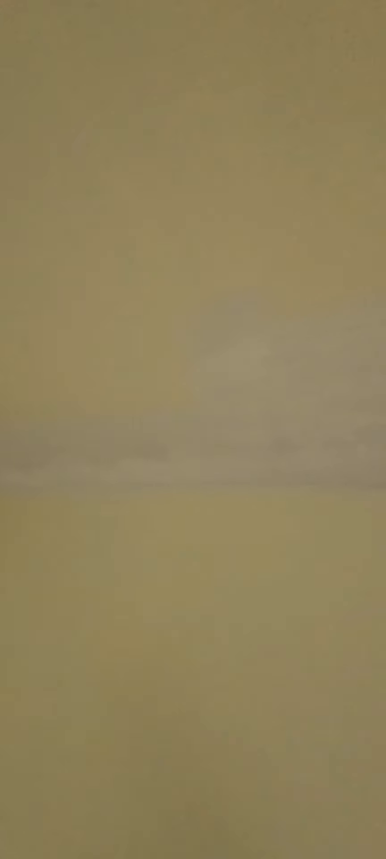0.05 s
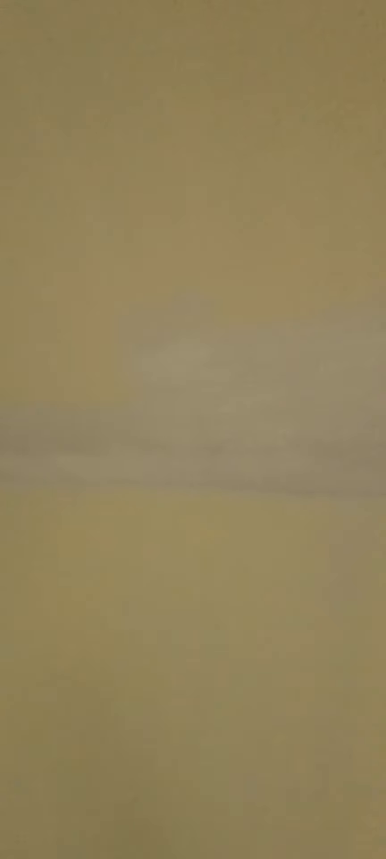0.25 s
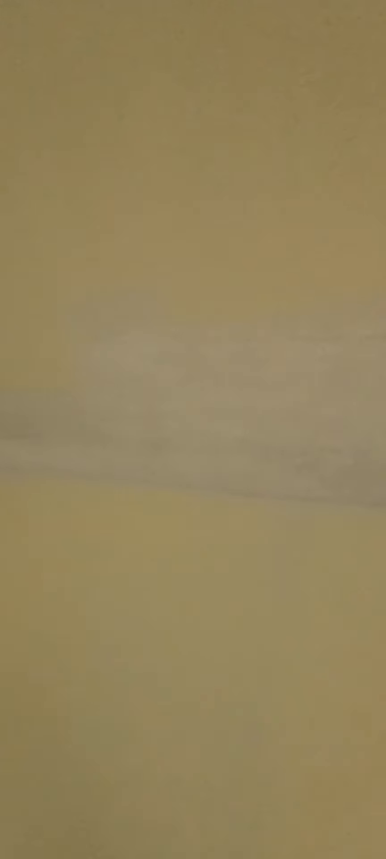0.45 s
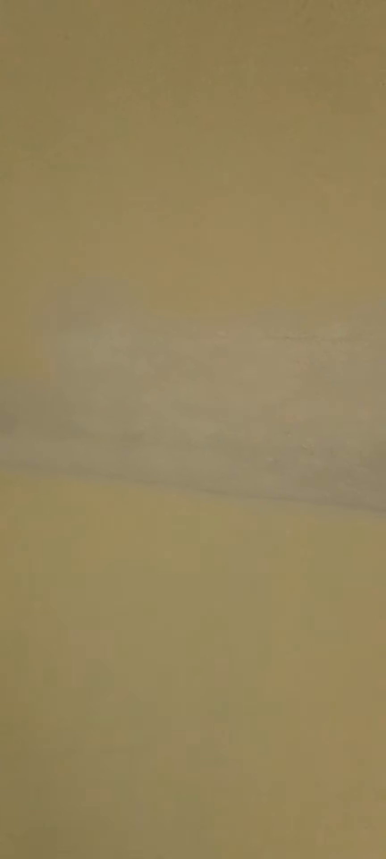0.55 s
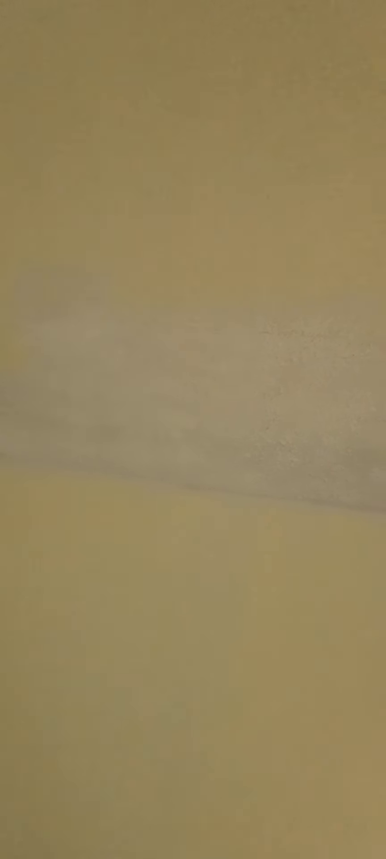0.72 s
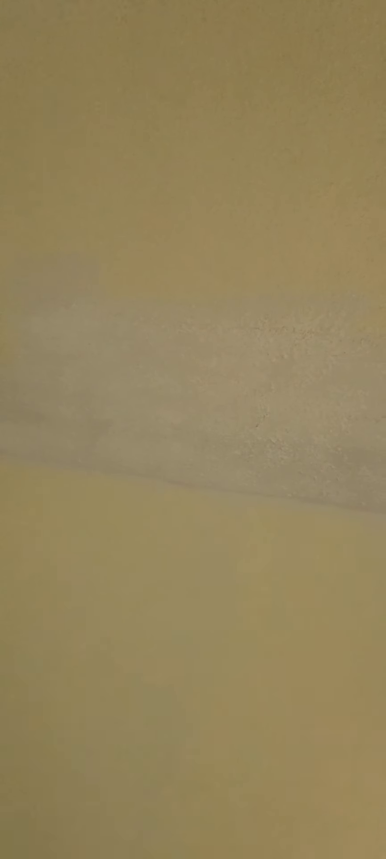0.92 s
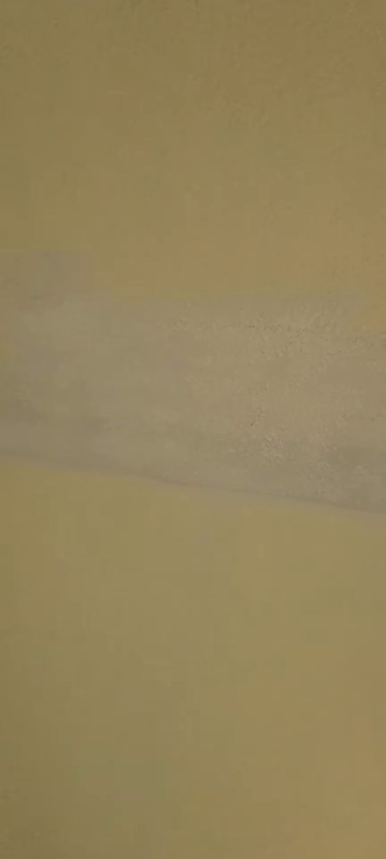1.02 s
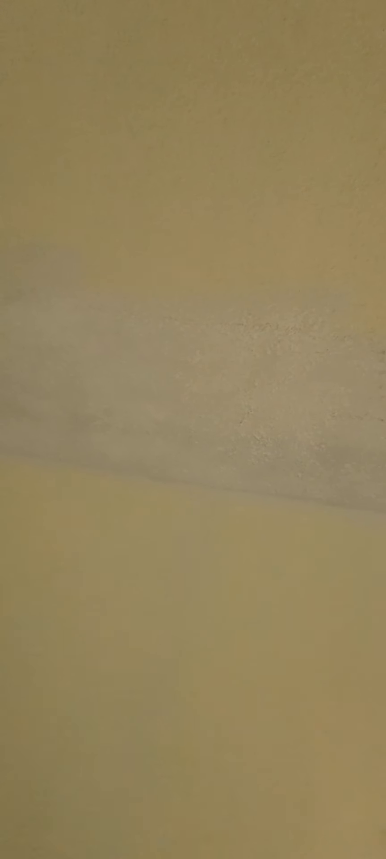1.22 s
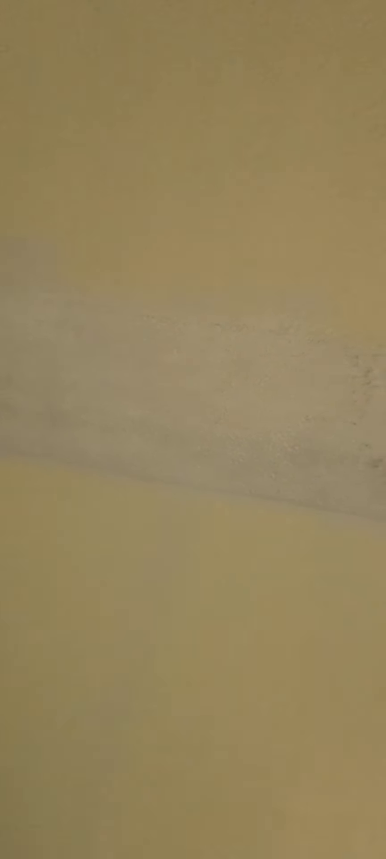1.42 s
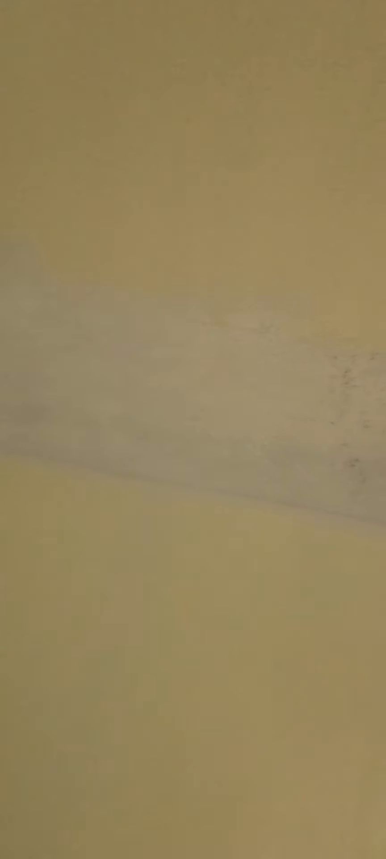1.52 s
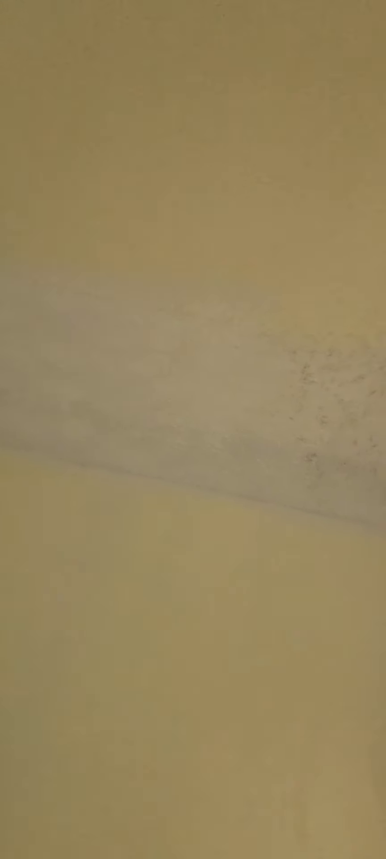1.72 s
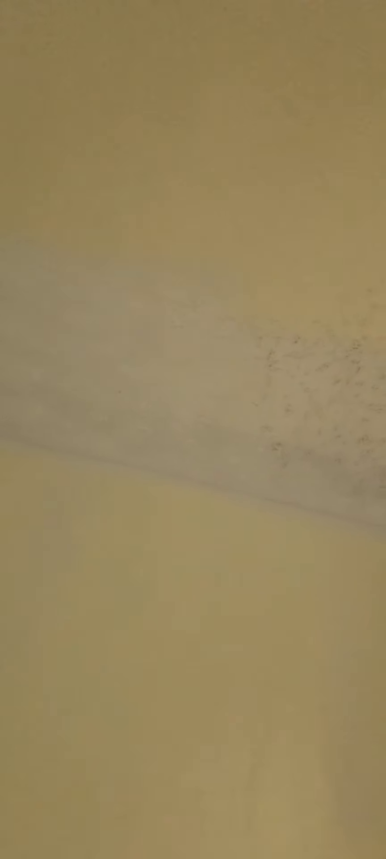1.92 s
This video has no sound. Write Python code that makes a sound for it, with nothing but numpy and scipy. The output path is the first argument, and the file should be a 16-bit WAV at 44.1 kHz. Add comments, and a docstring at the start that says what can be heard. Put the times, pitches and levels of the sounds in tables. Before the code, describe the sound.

Wet plaster splats loudly on a wall, followed by short, gritty trowel scrapes.

```python
"""Plastering a wall in a bare room

Wet plaster strikes the wall, exciting its modes: one loud splat and a few soft ones, with low thuds.
Sand dragged under a steel trowel makes gritty scrapes; the blade ticks and squelches the plaster.
The work reverberates in the room, and a low rumble and a faint hiss fill the pauses."""
import sys
import numpy as np
from scipy import signal
from scipy.fft import rfft, irfft, next_fast_len
from scipy.io import wavfile

SR = 44100
rng = np.random.default_rng(int(sys.argv[2]) if len(sys.argv) > 2 else 0)


def to_wav(sig):
    """Store sig (one row per channel, or 1-D mono) as 16-bit WAV at the path in sys.argv[1].

    Samples outside -1..1 are clipped; the rate is SR.
    """
    pcm = np.clip(np.atleast_2d(sig), -1, 1) * 32767
    pcm = np.round(pcm).astype(np.int16)
    wavfile.write(sys.argv[1], SR, pcm.T)  # frames by channels


N = 85995
TIME = np.arange(N) / SR


def amp(db):
    """Amplitude ratio of a level in decibels."""
    return 10 ** (np.asarray(db) / 20)


def unit(x):
    """Normalisation to rms 1."""
    return x / np.sqrt(np.mean(x ** 2) + 1e-20)


def along(points, hz):
    """Interpolation of (f/Hz, value) points on a logarithmic frequency axis."""
    f, v = np.transpose(points)
    return np.interp(np.log(hz + 1), np.log(f + 1), v)


def filtered(x, response):
    """Linear filtering: the spectrum is multiplied by a frequency response."""
    n = x.shape[-1]
    padded = next_fast_len(n + SR // 4)
    return irfft(rfft(x, padded) * response(np.fft.rfftfreq(padded, 1 / SR)), padded)[..., :n]


def shelves(hz, bass_db, treble_db, bass_hz=543, treble_hz=3240):
    """Spectral tilt: the gain in dB of a bass and a treble shelf."""
    return bass_db / (1 + (hz / bass_hz) ** 2) + treble_db * hz ** 2 / (hz ** 2 + treble_hz ** 2)


def envelope(start, rise, hold, fall_db_per_s):
    """Exponential decay after a linear rise and a hold."""
    t = TIME - start
    return np.clip(t / max(rise, 1 / SR), 0, 1) * amp(-fall_db_per_s * np.maximum(t - rise - hold, 0))


def grit(colour_db, grains_per_s=5000, spread_db=3):
    """Granular noise: dense tiny impacts of uneven size merge into a coloured rush at rms 1."""
    sizes = amp(spread_db * rng.standard_normal(N))
    grain = (np.arange(N) * grains_per_s / SR).astype(int)
    return unit(filtered(rng.standard_normal(N) * sizes[grain], lambda hz: amp(colour_db(hz))))


def ringing(x, modes, depth):
    """Resonance: each damped mode lifts its band and rings on; depth scales the lift in dB."""
    def response(hz):
        return 1 + sum((amp(depth * db) - 1) * 1j * hz * width / (centre**2 - hz**2 + 1j * hz * width)
                       for centre, width, db in modes)
    return filtered(x, response)


# likeness of left and right: f/Hz, correlation
COHERENCE = [(50, 1), (130, 0.82), (300, 0.71), (600, -0.25), (1200, 0.16), (2500, 0.0012), (15000, 0.096)]
# left minus right: f/Hz, level/dB
BALANCE = [(50, -1), (300, -2), (700, -2.5), (2500, -2.5), (6000, -4), (9000, 4), (15000, 1)]
def diffuse(pair):
    """Partial coherence: two independent noises mix as a diffuse field does at two microphones."""
    def weights(hz):
        angle = np.arccos(np.clip(along(COHERENCE, hz), -1, 1)) / 2
        return np.array([np.cos(angle), np.sin(angle)])
    mid, side = filtered(pair, weights)
    left_right = np.array([mid + side, mid - side])
    return filtered(left_right, lambda hz: amp(along(BALANCE, hz) * np.array([[.5], [-.5]])))


def room_noise(spectrum):
    """Stationary noise in a diffuse field, at rms 1."""
    field = diffuse(rng.standard_normal((2, N)))
    return unit(filtered(field, lambda hz: amp(along(spectrum, hz))))


# plaster landing: t/s, rise/s, hold/s, level/dB, bass/dB, treble/dB, ring depth, thud level/dB
LOADS = [(0.0, 0.0013, 0.02, -52, 10, -1.5, 0.8, -90), (0.239, 0.0072, 0.026, -22.5, -5.5, 3, 0.48, -41),
         (0.695, 0.01, 0.013, -42.5, 5, -3.5, 0.02, -50), (1.009, 0.023, 0.013, -43, 6, -6, 0.64, -59),
         (1.343, 0.015, 0.006, -47.5, 10.5, -10, 0.2, -54),
         (1.602, 0.0037, 0.031, -49, 11.5, 12.5, 0.65, -62)]
# wet impact: f/Hz, level/dB
SPLAT_SPECTRUM = [(40, -26), (120, -26.5), (200, -19), (380, -9), (520, -5.5), (900, -9.5), (1250, -3.5),
                  (1650, -10), (2100, -9.5), (3000, -12), (4300, -19), (7200, -19.5), (11000, -19.5),
                  (15500, -18)]
# the struck wall: f/Hz, bandwidth/Hz, lift at depth 1/dB
WALL_MODES = [(490, 14, 11), (728, 14, 10), (835, 10, 9), (1092, 9, 11), (1190, 14, 6), (1269, 14, 9),
              (1870, 12, 7), (2089, 20, 6), (2690, 14, 6), (3086, 16, 8), (4180, 22, 7)]
def splats():
    """Impact excitation: each load lands as a shower of wet lumps that rings the wall."""
    loads = []
    for start, rise, hold, db, bass_db, treble_db, depth, _ in LOADS:
        lumps = grit(lambda hz: along(SPLAT_SPECTRUM, hz) + shelves(hz, bass_db, treble_db))
        shower = envelope(start, rise, hold, fall_db_per_s=500) * lumps
        loads.append(amp(db) * ringing(shower, WALL_MODES, depth))
    return loads


# the wall giving under a load: f/Hz, level/dB
THUD_SPECTRUM = [(25, -7), (60, 0), (125, -9), (180, -11.5), (300, -4.5), (600, -26), (2000, -82)]
def thuds():
    """Momentum transfer: the weight of each load gives the wall a low push."""
    push = sum(amp(db) * envelope(start, rise=.0046, hold=.004, fall_db_per_s=141)
               for start, *_, db in LOADS)
    return push * room_noise(THUD_SPECTRUM)


# trowel strokes: t/s, rise/s, hold/s, level/dB, bass/dB, treble/dB, ring depth, edge re rasp/dB
STROKES = [(0.0, 0.005, 0.19, -68, 12, -9, 0.25, -12), (0.219, 0.025, 0.01, -29.5, -34.5, -29.5, 0.66, -19),
           (0.454, 0.025, 0.14, -64.5, -2, 12, 0.35, 1), (0.952, 0.034, .005, -51.5, -14, -29, 0.43, -12),
           (0.992, 0.0091, 0.018, -36, -10, -9, 0.31, -30), (1.131, 0.036, 0.03, -57, 0, -12, 1, -2),
           (1.251, 0.013, 0.014, -40.5, -4.5, -8.5, 0.73, -20), (1.27, 0.023, .005, -42, 4, 5.5, 1.74, 11),
           (1.315, 0.018, 0.023, -39, -2, 1.5, 0.22, -14), (1.422, 0.064, 0.027, -52.5, -6, 9, 0.33, -27),
           (1.6, 0.0088, 0.13, -55.5, 17, -4, 0.19, -24), (1.76, 0.024, 0.066, -54.5, 8.5, -4, 0.75, -2.5)]
# dragged sand: f/Hz, level/dB
RASP_SPECTRUM = [(100, -44), (400, -12), (900, -1), (1400, -7.5), (2200, -1), (3800, 0), (5000, -7.5),
                 (6700, -4), (10000, -6.5), (15500, -2)]
# hiss of the blade's edge: f/Hz, level/dB
EDGE_SPECTRUM = [(1000, -56), (6000, -28), (9000, -14), (12000, -12), (13500, -4), (15500, -4.5)]
# the steel blade: f/Hz, bandwidth/Hz, lift at depth 1/dB
BLADE_MODES = [(1400, 28, 17), (2165, 78, 9.5), (4180, 52, 7.5), (6360, 150, 5.5)]
STROKE_FALL_DB_PER_S = 412
def scrapes():
    """Friction: sand drags under the blade and excites its modes; the edge adds a thin hiss."""
    strokes = []
    for start, rise, hold, db, bass_db, treble_db, depth, edge_db in STROKES:
        rasp = grit(lambda hz: along(RASP_SPECTRUM, hz) + shelves(hz, bass_db, treble_db))
        edge = amp(edge_db) * grit(lambda hz: along(EDGE_SPECTRUM, hz))
        friction = envelope(start, rise, hold, STROKE_FALL_DB_PER_S) * (rasp + edge)
        strokes.append(amp(db) * ringing(friction, BLADE_MODES, depth))
    return strokes


# the building's drone: f/Hz, level/dB
RUMBLE_SPECTRUM = [(20, -56), (35, -9), (50, 0.5), (65, 0.5), (80, -8), (110, -5.5), (160, -15.5),
                   (400, -25), (1500, -59)]
# its swells: t/s, level/dB
RUMBLE_SWELLS = [(0, -61), (.2, -64.5), (.35, -53), (.55, -62.5), (.9, -58.5), (1.0, -62.5), (1.2, -59.5),
                 (1.5, -57.5), (1.6, -59), (1.95, -57.5)]
def rumble():
    """Amplitude modulation: a low drone in the building slowly swells and sinks."""
    level_db = np.interp(TIME, *np.transpose(RUMBLE_SWELLS))
    return amp(level_db) * room_noise(RUMBLE_SPECTRUM)


# the room's hiss: f/Hz, level/dB
HISS_SPECTRUM = [(100, -19.5), (300, -0.5), (1000, -2), (2000, -7.5), (6500, -13), (10000, -16.5),
                 (15500, -13.5)]
def hiss(db=-58.5):
    """Ambient noise: a faint, steady broadband floor."""
    return amp(db) * room_noise(HISS_SPECTRUM)


# blade touching down: t/s, level/dB, treble tilt/(dB per octave)
CONTACTS = [(0.854, -41, 2), (1.001, -32.5, -7.5), (1.4884, -35.5, 12), (1.608, -52, -22)]
# one contact: f/Hz, level/dB
TICK_SPECTRUM = [(300, -52), (2000, -2.5), (4200, -4), (7000, 1), (10000, 1.5), (15500, 3.5)]
def ticks(pivot_hz=7000):
    """Impulsive contact: a brief touch of the blade spreads its energy over a wide band."""
    out = np.zeros(N)
    for start, db, tilt in CONTACTS:
        contact = grit(lambda hz: along(TICK_SPECTRUM, hz) + tilt * np.log2(hz / pivot_hz + .5))
        out += amp(db) * envelope(start, rise=.0015, hold=0, fall_db_per_s=856) * contact
    return out


# plaster under the closing blade: t/s, duration/s, first f/Hz, last f/Hz, level/dB
SQUEEZES = [(1.016, .04, 800, 474, -58.5), (1.265, .11, 1750, 893, -50.5)]
def squelches(half_width_hz=260, rise_s=.016):
    """Squeeze flow: a wet band of noise sinks in pitch as the blade presses the plaster flat."""
    out = np.zeros(N)
    for start, length, first_hz, last_hz, db in SQUEEZES:
        pitch = np.interp(TIME, [start, start + length], [first_hz, last_hz])
        carrier = np.exp(2j * np.pi * np.cumsum(pitch) / SR)
        flutter = filtered(rng.standard_normal((2, N)), lambda hz: 1 / (1 + (hz / half_width_hz) ** 2))
        band = unit(np.real((flutter[0] + 1j * flutter[1]) * carrier))
        out += amp(db) * envelope(start, rise_s, length - rise_s, STROKE_FALL_DB_PER_S) * band
    return out


# reverberation time of the bare room: f/Hz, T60/s
ROOM_T60 = [(80, 0.27), (300, 0.53), (1000, 0.45), (2500, 0.5), (5000, 0.46), (7500, 0.4), (10000, 0.36),
            (15500, 0.22)]
def room(x, build_s=.00067, direct_db=-2.5, pan_db=8, lag_s=.0002):
    """Reverberation: direct sound, earlier and louder on the right, then the walls' diffuse tail."""
    hz, t, spectra = signal.stft(rng.standard_normal((2, SR)), SR, nperseg=256)
    decay = amp(-60 * t / along(ROOM_T60, hz)[:, None])
    tail = signal.istft(spectra * decay, SR, nperseg=256)[1]
    tail *= 1 - np.exp(-np.arange(tail.shape[1]) / SR / build_s)
    tail = diffuse(tail / np.linalg.norm(tail[0]))
    sides = np.array([[-.5], [.5]])
    gains = amp(direct_db + pan_db * sides)
    direct = filtered(x, lambda hz: gains * np.exp(2j * np.pi * hz * lag_s * sides))
    return direct + signal.fftconvolve(x[None], tail, axes=1)[:, :N]


def scene():
    """Superposition: each splat and scrape excites the room from a new spot, over the room's noise."""
    work = sum(room(x) for x in splats() + scrapes() + [squelches(), ticks()])
    return work + thuds() + rumble() + hiss()


# the microphone's treble shelf: f/Hz, gain/dB
MIC_RESPONSE = [(7200, 0.5), (7900, -13.5), (15500, -13)]
def record(dry, top_hz=15800):
    """Band limiting: the microphone shelves the top octave down and passes nothing above it."""
    return filtered(dry, lambda hz: amp(along(MIC_RESPONSE, hz)) * (hz < top_hz))


dry = scene()
out = record(dry)
to_wav(out)
```